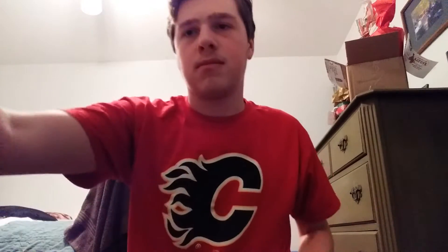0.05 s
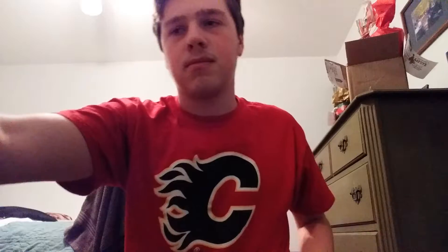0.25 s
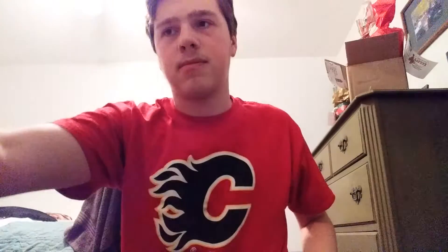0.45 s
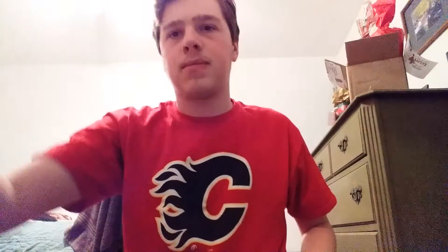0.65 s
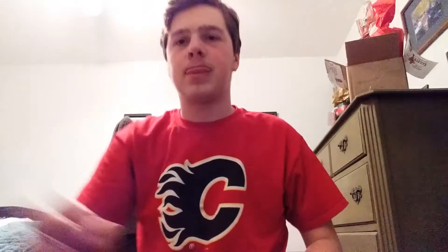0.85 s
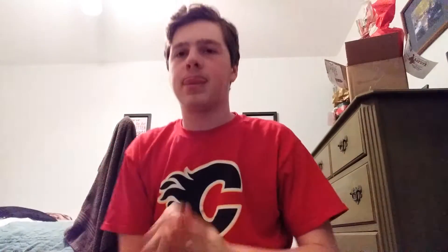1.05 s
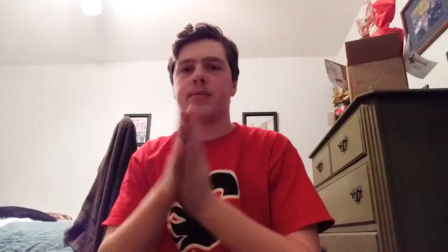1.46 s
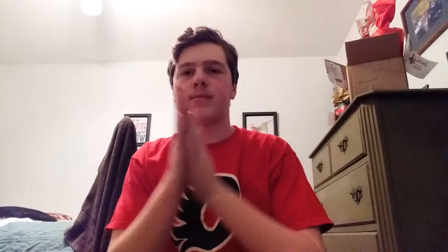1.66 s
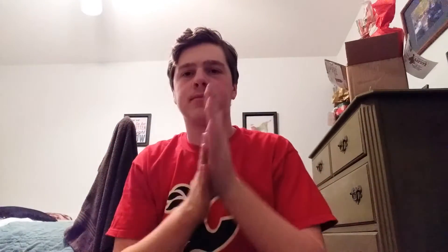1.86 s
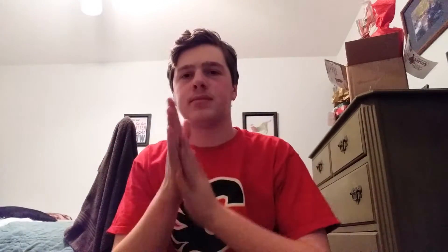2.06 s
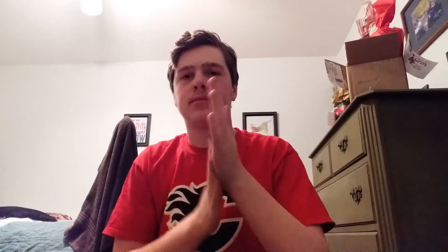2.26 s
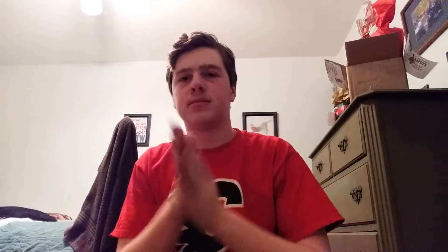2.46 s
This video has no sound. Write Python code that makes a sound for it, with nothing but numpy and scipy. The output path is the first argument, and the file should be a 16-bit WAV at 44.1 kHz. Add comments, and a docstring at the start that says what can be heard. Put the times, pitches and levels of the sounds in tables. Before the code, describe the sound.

Palms rub together in about six soft, dry swishes in a quiet bedroom. Before the rubbing, the camera knocks and rocks briefly on furniture, right at the microphone, followed by faint, dull shuffling.

```python
"""Rubbing hands in a quiet bedroom

Right at the two microphones, a hand lets go of the camera, which knocks and rocks on the furniture.
After some dull shuffling the palms meet and rub back and forth, about four strokes a second:
skin hisses with the speed of the slide, and pockets of air between the hands ring briefly as they open."""
import sys
import numpy as np
from scipy import signal
from scipy.fft import rfft, irfft
from scipy.io import wavfile

SR = 44100
rng = np.random.default_rng(int(sys.argv[2]) if len(sys.argv) > 2 else 0)


def to_wav(s):
    """Save 16-bit WAV."""
    ch = np.atleast_2d(s).T  # columns
    pcm = np.round(np.clip(ch, -1, 1) * 32767)  # PCM
    wavfile.write(sys.argv[1], SR, pcm.astype(np.int16))


N = 110250
T, HZ = np.arange(N) / SR, np.fft.rfftfreq(N, 1 / SR)

# Spectra of room tone with microphone hiss, and of shuffling: f/Hz, relative level/dB
ROOM_TONE_SPECTRUM = [(20, -19), (45, -13.5), (75, 1), (170, -4.5), (230, -2), (300, -8), (450, -17.5),
                      (2000, -24.5), (5000, -29.5), (10000, -29), (15500, -26)]
SHUFFLE_SPECTRUM = [(30, -29.5), (60, -11.5), (85, -6), (135, 3), (180, -10), (230, 0), (300, -14),
                    (420, -29), (800, -60.5), (4000, -63)]
# Likeness of the two microphones for room tone, shuffling and drags: f/Hz, correlation
ROOM_LIKENESS = [(60, 0.91), (250, 0.69), (600, 0.27), (2000, .2), (16000, 0.07)]
# Shuffling as the body moves: t/s, level/dB
SHUFFLE_LEVEL = [(0, -94), (.225, -64), (.45, -56.5), (.62, -57.5), (.85, -55), (.95, -74.5), (1.04, -68.5),
                 (1.1, -60), (1.27, -59.5), (1.42, -73.5), (2.5, -82.5)]
# Reverberation of the bedroom: f/Hz, t60/s
ROOM_DECAY = [(100, .38), (250, .33), (600, .26), (3000, .28), (10000, .22)]

# The camera lands and rocks: t/s, thump gain/dB, clatter gain/dB, click gain/dB
CONTACTS = [(.2405, -1.8, 0.5, -4.5), (0.2446, -40, 0.5, -36), (0.2502, -6, -3, -38),
            (0.2739, -4, -6, -20.5), (0.2961, -14.5, -20, -24), (0.3967, -20, -21.5, -47),
            (0.4494, -38, -40, -49.5), (.46, -33.5, -61, -63), (0.5121, -39, -41.5, -70),
            (0.57, -34.5, -62, -68)]
# Modes of camera and furniture: f/Hz, level/dB, t60/s
MODES = [(87.47, -24, 0.3153), (122, -10.5, .18), (144.5, -9, 0.21), (193.2, -0.5, 0.049),
         (233.3, -18.5, .22), (259.4, -12.5, 0.089), (299.2, -24.5, 0.18), (376.8, -26, 0.16),
         (417.3, -26.5, .11), (567, -25, 0.1), (894, -30.5, .14), (1039, -31, .1), (1163, -32.5, .09),
         (1354, -29, .035), (1956, -38, .1), (2867, -42, .09)]
# Spectra of the casing's clatter and the contact click: f/Hz, relative level/dB
CLATTER_SPECTRUM = [(250, -5.5), (430, -1.5), (570, 5.5), (700, -2.5), (900, 1.5), (1270, -0.5),
                    (1650, -14), (1980, -3), (2400, -14.5), (2850, -9.5), (3300, -19.5), (3900, -22),
                    (5500, -34), (8300, -38.5), (16000, -48.5)]
CLICK_SPECTRUM = [(300, -1), (1900, 10), (3800, 5.5), (6000, -6.5), (8300, -6), (9300, -17), (11000, -9),
                  (16000, -13.5)]
# Likeness of the microphones for clatter and click: f/Hz, correlation
KNOCK_LIKENESS = [(100, .97), (250, .8), (500, .4), (1000, .1), (2000, -.4), (4000, .15), (12000, 0)]

# Palms pressing flat: middle t/s, half length/s, level/dB
FLAT_DRAGS = [(1.15, 0.017, -54.5), (1.199, 0.03, -53), (1.231, 0.085, -63), (2.029, 0.052, -51)]
# Strokes of the palms: fastest t/s, speeding up/s, slowing down/s, pressed gain/dB, brushed gain/dB
PALM_STROKES = [(1.323, 0.059, 0.081, -23, -11), (1.542, 0.062, 0.07, 2.5, 1.5), (1.8, 0.089, 0.063, 0, -3),
                (2.035, 0.077, 0.069, 0.5, 3.5), (2.261, 0.093, 0.095, 0, -4),
                (2.515, 0.07, 0.057, -7.5, 5.5)]
# Spectra of skin dragging, pressed hard and brushing lightly: f/Hz, relative level/dB
DRAG_SPECTRUM = [(40, -25), (80, -1.5), (130, -2), (300, -4), (480, -17), (565, -9), (640, -15), (800, -19),
                 (1100, -16.5), (1500, -32.5), (2500, -38), (8000, -59)]
PRESSED_SPECTRUM = [(300, -30), (1200, -49), (1500, -13), (2100, 3), (2700, -6), (3200, -2), (3750, -3.5),
                    (4350, -1.5), (4950, -6.5), (5700, -10.5), (7000, -8.5), (8000, -6), (8500, -17),
                    (10000, -21), (13500, -16.5), (16000, -18.5)]
BRUSHED_SPECTRUM = [(300, -42), (1400, -7), (1800, -9), (2100, 4), (2700, -10.5), (3700, -16), (4500, -4.5),
                    (5700, -9), (6800, -3.5), (7400, -2.5), (8050, -2.5), (8800, -16), (11000, -14.5),
                    (16000, -13)]
# Air pockets between palms and fingers: widest t/s, half length/s, f/Hz, gain/dB
AIR_POCKETS = [(1.514, 0.022, 4400, -4.5), (1.533, 0.018, 2280, -4), (1.545, 0.024, 1694, -11.5),
               (1.56, 0.0098, 4400, -2.5), (1.578, 0.034, 1946, -5.5), (1.787, 0.017, 1497, -0.5),
               (1.801, 0.0075, 4180, -1), (1.842, 0.023, 2080, -5), (1.964, 0.021, 1980, -11),
               (1.997, .018, 4250, -6), (2.007, 0.0072, 3120, 2.5), (2.041, 0.022, 2007, -0.5),
               (2.046, 0.014, 3145, -1), (2.235, 0.013, 1937, -3.5), (2.26, 0.013, 3130, -5),
               (2.268, 0.0076, 4330, 0), (2.279, 0.012, 2170, -1), (2.309, 0.028, 1883, -1),
               (2.471, 0.037, 1920, -11.5), (2.495, 0.013, 4560, -5.5)]
# Likeness of the microphones for rubbing: f/Hz, correlation (capped at 1)
RUB_LIKENESS = [(200, 2), (1200, 0.5), (2200, 0.67), (4300, 0.9), (4900, 0), (6300, 0.4), (8000, 0.5),
                (9000, -0.06), (16000, -0.1)]
# Lead of the hands' sound at the left microphone: f/Hz, phase/rad
HANDS_LEAD = [(1100, 0), (1500, -1.8), (2100, -.1), (2800, .8), (3600, 0), (4700, -.3), (5300, 2),
              (5700, .6), (6400, .5), (7200, 2), (7800, .2), (10500, .4), (11700, 2), (12500, .7),
              (15000, 1)]
# Balance of the hands' sound: f/Hz, left minus right level/dB
HANDS_BALANCE = [(100, 1.5), (450, 5.5), (1000, 7), (1400, 8), (2000, -1), (2400, 5), (2800, -0.5),
                 (3250, 3.5), (4200, 1.5), (5100, -4.5), (5900, 5), (6700, -2), (7500, 14), (8600, 1),
                 (13500, 5)]


def amp(db):
    """Decibels to gain."""
    return 10 ** (np.asarray(db) / 20)


def unit(x):
    """Scales to rms 1."""
    return x / np.sqrt(np.mean(x ** 2) + 1e-20)


def curve(points, hz=HZ):
    """Reads a table on a log-frequency axis."""
    f, value = np.transpose(points)
    return np.interp(np.log(hz + 1), np.log(f), value)


def decay(t, t60):
    """Dies away from time zero, 60 dB in t60 seconds."""
    return (t >= 0) * np.exp(-np.log(1000) * np.maximum(t, 0) / t60)


def white():
    """Two unrelated noises."""
    return rng.standard_normal((2, N))


def mic_pair(x, spectrum, likeness):
    """Colours two unrelated signals and makes them partly alike, as at neighbouring microphones."""
    a, b = rfft(x)
    correlation = np.clip(curve(likeness), -1, 1)
    mid, side = a * np.sqrt(1 + correlation), b * np.sqrt(1 - correlation)
    return unit(irfft(np.array([mid + side, mid - side]) * amp(curve(spectrum)), N))


def room_tone():
    """Steady bedroom rumble and microphone hiss."""
    return amp(-68.5) * mic_pair(white(), ROOM_TONE_SPECTRUM, ROOM_LIKENESS)


def shuffling():
    """Low rustle of a body moving."""
    level = amp(np.interp(T, *np.transpose(SHUFFLE_LEVEL)))
    return level * mic_pair(white(), SHUFFLE_SPECTRUM, ROOM_LIKENESS)


def camera_ring(rise_s=0.0015, casing_from_hz=450):
    """Ringing of camera and furniture, split into low modes and the casing's higher ones."""
    low, casing = np.zeros((2, N))
    for hz, db, t60 in MODES:
        mode = amp(db) * decay(T, t60) * np.sin(2 * np.pi * hz * T) * (1 - np.exp(-T / rise_s))
        if hz < casing_from_hz:
            low += mode
        else:
            casing += mode
    return low, casing


def camera_knocks(contact_s=0.0012, soft_rise_s=0.0056, clatter_rise_s=0.0025, left_lag_s=0.00024):
    """Each contact clicks, clatters in the casing and rings the furniture; gentle thumps start softly."""
    low, casing = camera_ring()
    ring, clatter_power, click_power = np.zeros((3, N))
    for at, thump_db, clatter_db, click_db in CONTACTS:
        t = T - at
        softness = max(1 - amp(thump_db / 2), 0)
        press = np.clip(t / (contact_s + soft_rise_s * softness), 0, 1)
        onset = np.clip(t / clatter_rise_s, 0, 1) ** 0.5
        ring += press * amp(thump_db) * np.interp(t, T, low)
        ring += onset * amp(clatter_db) * np.interp(t, T, casing)
        # a short burst, then a fainter tail
        clatter_fade = decay(t, t60=0.03) + amp(-12.5) * decay(t, t60=0.27)
        click_fade = decay(t, t60=0.013) + amp(-27) * decay(t, t60=0.09)
        clatter_power += (onset * amp(clatter_db - 21.5) * clatter_fade) ** 2
        click_power += (amp(click_db - 17.5) * click_fade) ** 2
    direct = np.array([np.interp(T - left_lag_s, T, ring), ring])
    reverb = amp(-20) * bedroom(ring[None])
    clatter = np.sqrt(clatter_power) * mic_pair(white(), CLATTER_SPECTRUM, KNOCK_LIKENESS)
    click = np.sqrt(click_power) * mic_pair(white(), CLICK_SPECTRUM, KNOCK_LIKENESS)
    low_cut = signal.butter(3, 56, "high", fs=SR, output="sos")
    return signal.sosfilt(low_cut, direct + reverb + clatter + click)


def bedroom(x):
    """Diffuse tail of a small furnished room, starting 5 ms after the direct sound."""
    hz, t, noise = signal.stft(white()[:, :SR // 2], SR, nperseg=256)
    fade = decay(t - 0.005, curve(ROOM_DECAY, hz)[:, None])
    tail = signal.istft(noise * fade, SR, nperseg=256)[1]
    return signal.fftconvolve(x, tail / np.linalg.norm(tail[0]), axes=1)[:, :N]


def from_hands(x):
    """Places the hands by phase and level differences between the microphones, mostly to the left."""
    lean = amp(curve(HANDS_BALANCE) / 2) * np.exp(0.5j * curve(HANDS_LEAD))
    return unit(irfft(rfft(x) * np.array([lean, 1 / lean]), N))


def skin_friction(spectrum, likeness, slips_per_s=6200, spread_db=3, judder_db=2, judder_hz=89):
    """Countless tiny slips of skin ridges, in uneven clumps, as they reach the microphones."""
    slips = white() * (rng.random(N) < slips_per_s / SR)
    slips *= amp(spread_db * np.minimum(rng.exponential(1, N), 5))
    judder = unit(irfft(rfft(rng.standard_normal(N)) / (1 + (HZ / judder_hz) ** 2), N))
    hiss = (white() + 0.46 * unit(slips)) * amp(judder_db * judder)
    return from_hands(mic_pair(hiss, spectrum, likeness))


def palm_drags():
    """Flesh drags dully where the palms press flat: as they first meet and on one later stroke."""
    level = sum(amp(db) * np.exp(-abs((T - at) / half) ** 3) for at, half, db in FLAT_DRAGS)
    return level * skin_friction(DRAG_SPECTRUM, ROOM_LIKENESS)


def palm_strokes(fall_db=19.5, shape=2.13, brush_follow=0.55):
    """Each stroke swells and fades with sliding speed; light brushing outlasts the pressed middle."""
    pressed, brushed = np.zeros((2, N))
    for at, rise, fall, pressed_db, brushed_db in PALM_STROKES:
        slide_db = -fall_db * (abs(T - at) / np.where(T < at, rise, fall)) ** shape
        pressed += amp(pressed_db + slide_db)
        brushed += amp(brushed_db + brush_follow * slide_db)
    return (amp(-52) * pressed * skin_friction(PRESSED_SPECTRUM, RUB_LIKENESS)
            + amp(-60) * brushed * skin_friction(BRUSHED_SPECTRUM, RUB_LIKENESS))


def skin_tick(at=1.388, hz=3530, decay_s=0.00078):
    """One faint tick, dead centre, as skin unsticks between two strokes."""
    t = np.maximum(T - at, 0)
    return amp(-58.5) * np.sin(2 * np.pi * hz * t) * np.exp(-t / decay_s)


def resonate(x, hz, width_hz):
    """A steep resonance that follows the curve hz."""
    carrier = np.exp(2j * np.pi * np.cumsum(hz) / SR)
    pole = np.exp(-np.pi * width_hz / SR)
    return (carrier * signal.lfilter([(1 - pole) ** 2], [1, -2 * pole, pole * pole], x / carrier)).real


def air_pockets(bend=0.032, relative_width=0.095):
    """Friction rings each pocket of air as it opens and closes: a short, fuzzy whistle."""
    drive = from_hands(mic_pair(white(), [(100, 0), (10000, 0)], RUB_LIKENESS))  # flat spectrum
    whistles = np.zeros((2, N))
    for at, half, hz, db in AIR_POCKETS:
        near = abs(T - at) < 3 * half
        opening = np.exp(-((T[near] - at) / half) ** 2)
        pitch = hz * (1 + bend * (1 - opening))  # rises as the pocket closes
        ring = opening * resonate(drive[:, near], pitch, relative_width * hz)
        whistles[:, near] += amp(db - 52) * unit(ring) * np.sqrt(np.mean(opening ** 2))
    return whistles


def scene():
    """From the camera's position: its own knocks up close, the hands out in the room."""
    hands = palm_strokes() + air_pockets() + palm_drags() + skin_tick()
    return hands + amp(-7.5) * bedroom(hands) + camera_knocks() + shuffling() + room_tone()


def record(dry, edge_hz=15850):
    """The recorder's band limit."""
    low_pass = signal.firwin(511, edge_hz, window=("kaiser", 9), fs=SR)
    return signal.oaconvolve(dry, low_pass[None], "same")


dry = scene()
out = record(dry)
to_wav(out)
```